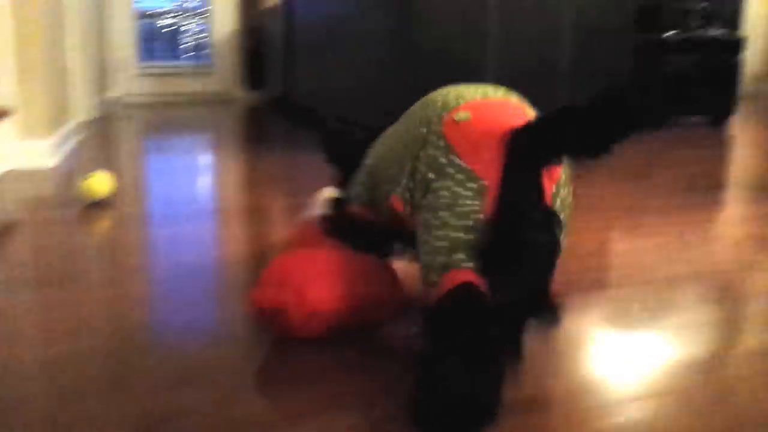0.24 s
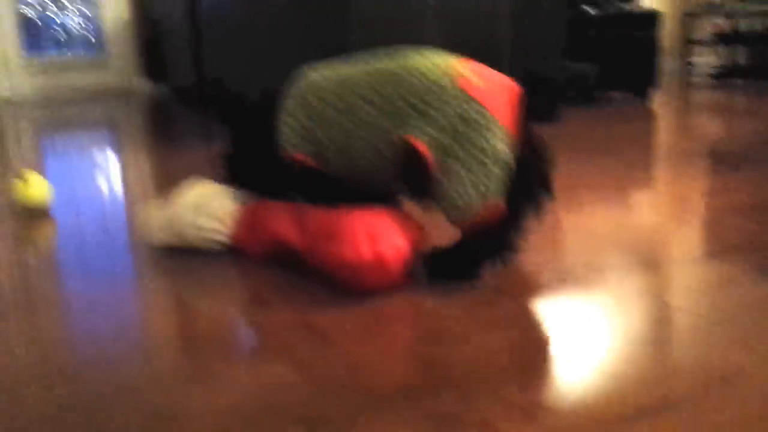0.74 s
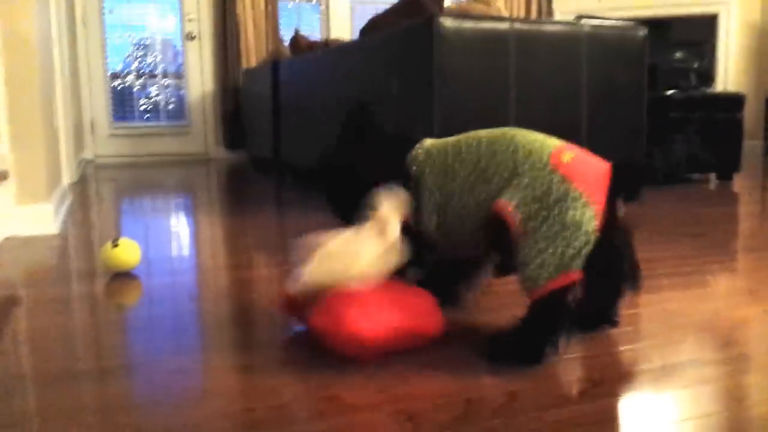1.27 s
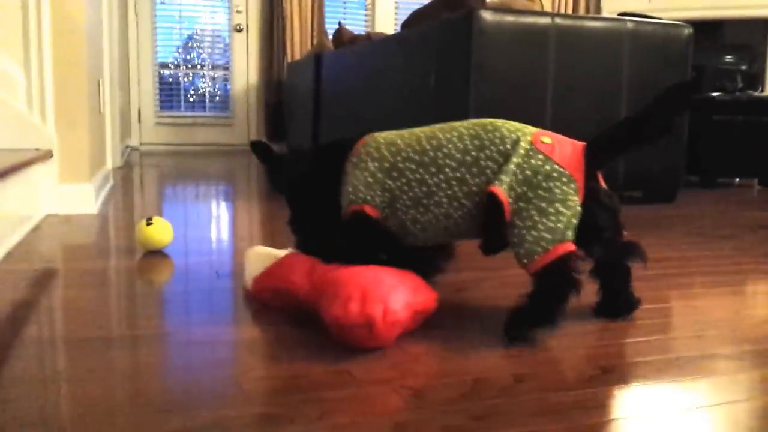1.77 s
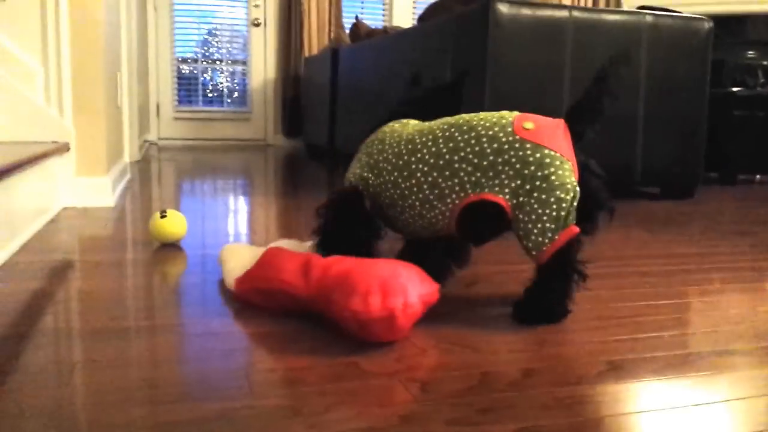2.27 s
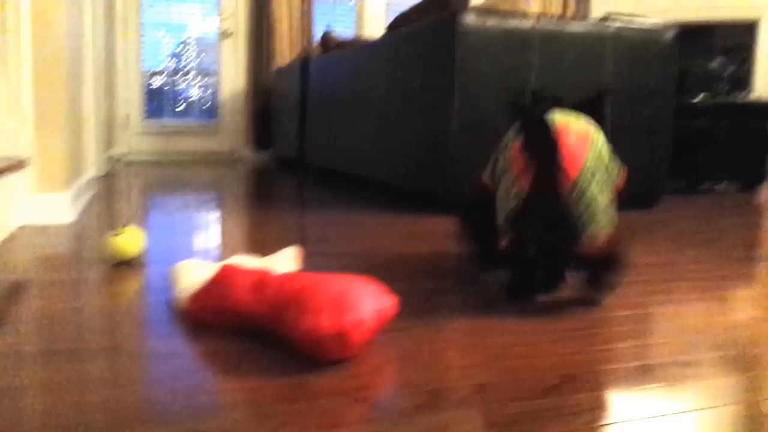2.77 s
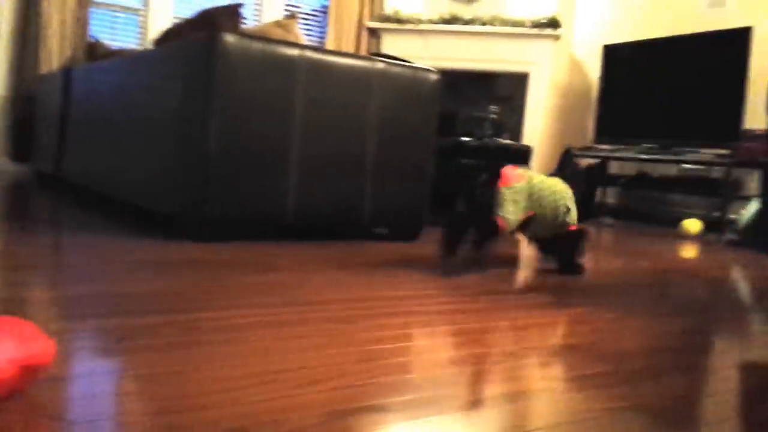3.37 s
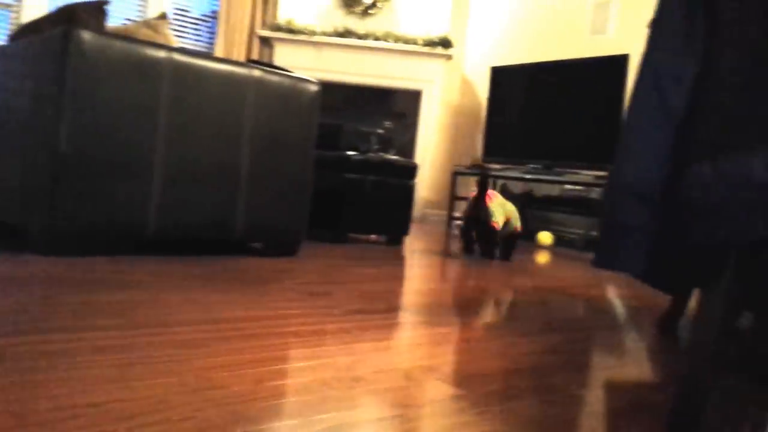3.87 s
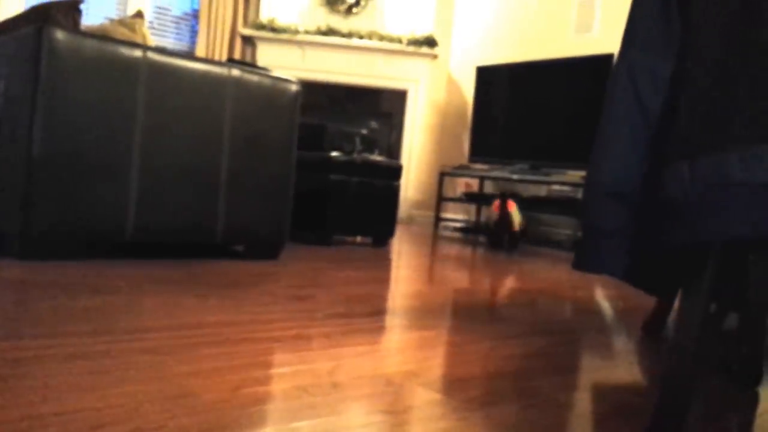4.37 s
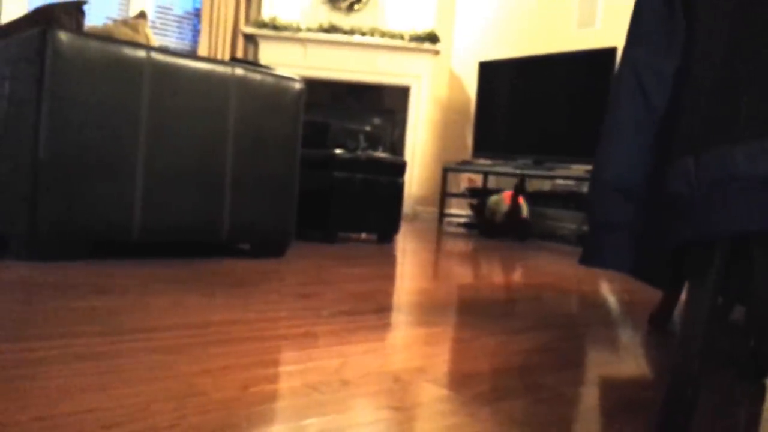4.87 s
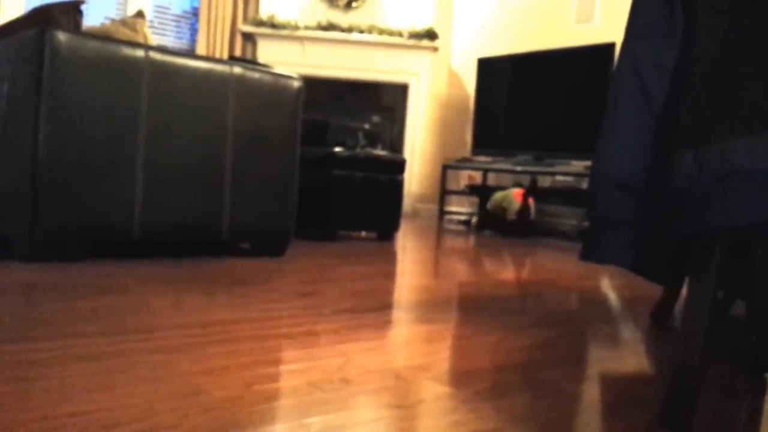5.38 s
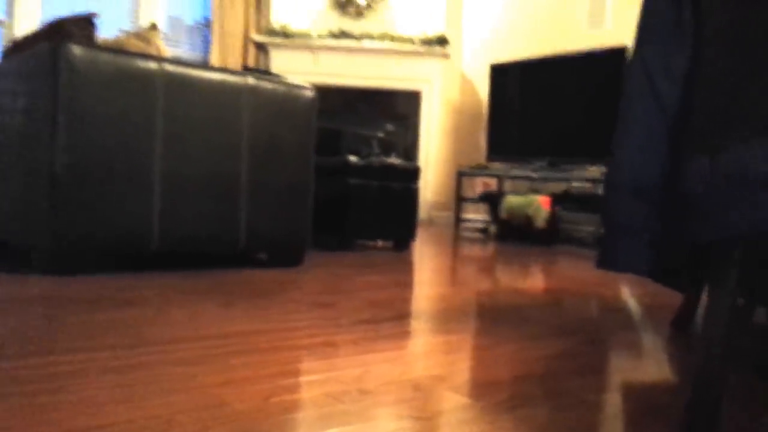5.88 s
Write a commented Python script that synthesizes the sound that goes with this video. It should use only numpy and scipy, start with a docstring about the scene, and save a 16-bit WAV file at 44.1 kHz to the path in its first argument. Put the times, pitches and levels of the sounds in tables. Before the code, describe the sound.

In a reverberant living room with a hardwood floor, a small dog is right beside a handheld camera. From 0 s its claws scratch finely, with soft paw thuds and brief scuffs; sharp loud clicks snap at about 0.3-0.4 s, with a dry tap at the left. It quietens to light scrapes and a soft toy thump near 1.2 s. At 1.4 s a tennis ball lands with a hollow knock and bounces faster and softer until about 2.4 s, amid isolated claw ticks. From 2.45 to 3.1 s claws scrabble hard and bright, with very sharp clicks around 2.7 and 2.95 s. The dog then runs off, 3.2-4.6 s, in pattering thuds, woody clacks and scrapes, increasingly distant and echoing. A scuff comes near 4.8 s, a clearer click at 5.1 s, then sparse faint scratches to 6.1 s. Low handling rumble, airy hiss and a faint appliance hum lie beneath.

```python
"""Claws of a small dog click and scrape on a hardwood floor as it scrabbles for grip and runs to the far wall:
slip-modulated noise, coloured by tips and board, wetter with distance. Paws and a plush toy thud, and a tennis
ball bounces to rest: decaying floor modes plus a noise slap. Planks clack as damped sines; short scuffs are
resonant noise, some along with claw strikes; one dry tap sounds at the left microphone. Beneath:
filtered-noise room air and handling rumble of a handheld camera, and an appliance's sine hum."""
import sys
import numpy as np
from scipy import signal
from scipy.fft import rfft, irfft, next_fast_len
from scipy.io import wavfile
from scipy.ndimage import uniform_filter1d, minimum_filter1d, map_coordinates

SR = 44100
rng = np.random.default_rng(int(sys.argv[2]) if len(sys.argv) > 2 else 0)


def file_out(sig):
    """Save sig as 16-bit WAV at sys.argv[1]."""
    # one column per channel
    cols = np.atleast_2d(sig).T
    # limit, then scale
    lim = np.clip(cols, -1, 1)
    pcm = np.round(lim * 32767).astype(np.int16)
    wavfile.write(sys.argv[1], SR, pcm)


N = 270068

# dog to microphones: t/s, distance/m
DISTANCE = [(0, 0.28), (1.9, 1.07), (2.7, 1.29), (3.2, 1.7), (4, 2.12), (6.1, 1.52)]
# scratching effort of the paws: t/s, level/dB
SCRATCH = [(0, -42), (.35, -46), (.7, -65.5), (.89, -43.5), (1.12, -71), (1.42, -49), (2.48, -52.5),
           (2.58, -33), (2.68, -38.5), (2.89, -31), (3.17, -38.5), (3.88, -37.5), (4.02, -46), (4.78, -43),
           (4.97, -51), (5.7, -60), (6.12, -56)]
# colour of claw on board: f/Hz, gain/dB
CLAW_COLOUR = [(100, -21.5), (300, -14), (900, -15.5), (1700, -9), (3400, -7), (4800, -5), (5600, 0.5),
               (6200, 4), (7000, -1.5), (8000, -5.5), (10000, -12), (12600, -20), (14400, -27.5),
               (15200, -57)]


def amp(db):
    """Amplitude factor of a level in dB."""
    return 10 ** (np.asarray(db) / 20)


def unit(x):
    """x scaled to rms 1."""
    return x / np.sqrt(np.mean(x ** 2) + 1e-20)


def along(points, hz):
    """(f/Hz, value) points interpolated on a log frequency axis."""
    f, v = np.transpose(points)
    return np.interp(np.log(hz + 1), np.log(f), v)


def curves(rows):
    """One value per sample for each column after the time."""
    s, *cols = np.transpose(rows)
    return [np.interp(np.arange(N) / SR, s, c) for c in cols]


def coloured(x, gain_db):
    """x through the causal minimum-phase filter of gain gain_db(hz), by cepstral folding."""
    n = x.shape[-1]
    m = 2 * next_fast_len(n // 2 + 2048)
    gain = amp(gain_db(np.fft.rfftfreq(m, 1 / SR)))
    cepstrum = irfft(np.log(np.maximum(gain, 1e-6)), m)
    cepstrum[1:m // 2] *= 2
    cepstrum[m // 2 + 1:] = 0
    return irfft(rfft(x, m) * np.exp(rfft(cepstrum)), m)[..., :n]


def pair(size, alike):
    """White noise at two microphones; alike is the shared fraction of power."""
    share = np.clip(alike, 0, 1)
    common = np.sqrt(share) * rng.standard_normal(size)
    return common + np.sqrt(1 - share) * rng.standard_normal((2, size))


def add(track, s, sound):
    """Mix a sound in at time s."""
    part = track[:, max(round(s * SR), 0):][:, :sound.shape[-1]]
    part += sound[..., :part.shape[1]]


def resonance_db(hz, centre_hz, q):
    """Gain of one broad resonance."""
    return -10 * np.log10(1 + q ** 2 * ((hz + 1) / centre_hz - centre_hz / (hz + 1)) ** 2)


def ripple(hz, spacing_hz):
    """Random spectral peaks and dips, new at every call."""
    place = hz / max(spacing_hz, 50)
    return map_coordinates(rng.standard_normal(int(place[-1]) + 4), [place])


def flutter(size, per_s):
    """Smooth random curve with per_s knots a second."""
    place = np.arange(size) * per_s / SR
    return map_coordinates(rng.standard_normal(int(place[-1]) + 4), [place])


def board_share(hz, edge_hz=4700):
    """1 where the boards ring, 0 in the treble where the claw tips do."""
    return 1 / (1 + (hz / edge_hz) ** 10)


def room(x, build_s=0.0044, early=0.48, early_life_s=0.0063):
    """Room response: strong first reflections, then a noise tail that decays band by band."""
    # f/Hz, t60/s
    reverb_t60 = [(150, 0.066), (1000, 0.89), (3500, 0.7), (6500, 0.58), (10000, 0.46), (15000, 0.21)]
    hz, t, z = signal.stft(rng.standard_normal((2, SR * 2 // 3)), SR, nperseg=256)
    decay = amp(-60 * t / along(reverb_t60, hz)[:, None])
    tail = signal.istft(z * decay, SR, nperseg=256)[1]
    t = np.arange(tail.shape[1]) / SR
    tail = tail * (1 - np.exp(-t / build_s)) * (1 + early * np.exp(-t / early_life_s))
    return signal.fftconvolve(x, tail / np.linalg.norm(tail[0]), axes=1)


def background(air_db=-58, hum_hz=119):
    """Filtered-noise room air and handling rumble; an appliance's sine hum, louder toward the far wall."""
    # f/Hz, gain/dB
    air_colour = [(59, -33), (100, -14), (129, -12), (169, -20), (297, -3.5), (502, -12), (607, -16),
                  (962, -15.5), (2750, -8), (3180, -13.5), (6090, -3.5), (13000, -26), (15000, -65)]
    handling_colour = [(20, -9), (33, -9), (45, 1), (65, 3), (150, 1), (220, 0.5), (380, -6), (600, -5.5),
                       (900, -11.5), (1600, -18), (4000, -61)]
    # camera handling and trembling boards: t/s, level/dB
    rumble_level = [(0, -47), (.27, -48.5), (.5, -61.5), (1.1, -63), (1.5, -48.5), (2.3, -50), (2.6, -46.5),
                    (3.4, -47.5), (3.7, -49), (4.5, -49), (6.12, -54.5)]
    # t/s, level/dB
    hum_level = [(0, -70), (2.5, -56.5), (4.5, -55), (6.12, -57)]
    air = amp(air_db) * unit(coloured(pair(N, alike=0.13), lambda hz: along(air_colour, hz)))
    shaking = unit(coloured(pair(N, alike=0.87), lambda hz: along(handling_colour, hz)))
    rumble = amp(curves(rumble_level)[0]) * shaking
    tone = np.sqrt(2) * np.sin(2 * np.pi * hum_hz * np.arange(N) / SR)
    return air + rumble + amp(curves(hum_level)[0]) * tone


def scuffle(board_db=-6, grains_per_s=160, grain_db=2.0):
    """Fine scratching noise; the harder it is, the more the tips outweigh the board."""
    easy_db, board_loss_db_per_db = -44, 0.15
    tip_db, = curves(SCRATCH)
    level_db = tip_db + board_db - board_loss_db_per_db * (tip_db - easy_db)
    grit = amp(grain_db * flutter(N, grains_per_s)) * pair(N, alike=0.035)
    tips = unit(coloured(grit, lambda hz: along(CLAW_COLOUR, hz) - 30 * board_share(hz)))
    # [::-1] swaps the channels
    board = unit(coloured(grit[::-1], lambda hz: along(CLAW_COLOUR, hz) - 30 * (1 - board_share(hz))))
    return amp(tip_db) * tips + amp(level_db) * board


def ring(modes, t, attack_s, damping, detune=0.0402):
    """Floor modes, struck at new strengths and pitches on every spot; rms 1 over the first 50 ms."""
    wave = np.zeros(len(t))
    for hz, db, t60 in modes:
        level_db = db + rng.normal(0, 2.9) - 60 * damping * t / t60
        wave += amp(level_db) * np.sin(2 * np.pi * (hz * rng.normal(1, detune) * t + rng.random()))
    wave = wave * (1 - np.exp(-t / attack_s))
    return wave / np.sqrt(np.mean(wave[:SR // 20] ** 2))


def thuds(rows, slap_t60_s, slap_q, damping, room_db):
    """Soft blows on the floor: slap of one board, hollow knock, then the slower boom of the whole span."""
    # floorboard modes: f/Hz, level/dB, t60/s at damping 1
    boom_modes = [(76, -6.5, 0.17), (87.2, -1.5, 0.19), (106.1, -9.5, 0.34)]
    knock_modes = [(133.8, -3.5, 0.51), (166, -0.5, 0.32), (196.4, 3, 0.28), (235.7, -0.5, 0.3),
                   (281.4, -4.5, 0.2), (349.5, -11, 0.15)]
    out, t = np.zeros((2, N)), np.arange(SR // 3) / SR
    for s, boom_db, knock_db, slap_db, slap_hz in rows:
        slap = unit(coloured(pair(len(t), alike=0.88), lambda hz: (
            2 * resonance_db(hz, slap_hz, slap_q) - 20 * (1 - board_share(hz, 2900)))))
        slap = slap * amp(slap_db + 7.5 - 60 * t / slap_t60_s)
        knock = amp(knock_db) * ring(knock_modes, t, 0.00047, damping) + slap
        add(out, s, knock + amp(boom_db) * ring(boom_modes, t, 0.019, damping))
        add(out, s, amp(room_db) * room(knock))
    return out


def paws(count=20, patter_hardness_db=-1):
    """Landings of paws and toy, and the run's lighter patter: a hard one slaps, a soft one booms."""
    # t/s, knock level/dB, hardness/dB, slap f/Hz
    landings = [(.002, -50, 12.5, 380), (.011, -55, 9.5, 620), (.316, -51.5, 8.5, 695),
                (0.545, -56, -6, 397), (.655, -59, 8, 350), (0.937, -64, -28.5, 398),
                (1.182, -41, -18.5, 446), (1.489, -40.5, -1, 700), (2.493, -45.5, 7.5, 750),
                (2.535, -37, -10, 680), (3.018, -44.5, 7.5, 940), (3.164, -38.5, -4, 400),
                (3.234, -54, 15.5, 596), (3.261, -37.5, -4, 590), (3.321, -45.5, 3, 594),
                (3.352, -42.5, -3.5, 604), (3.43, -41.5, -1, 660), (3.471, -39, 1.5, 565),
                (3.568, -43, 1, 605), (3.872, -43.5, 2.5, 670), (4.03, -50.5, 8.5, 730),
                (4.391, -44, -7, 597)]
    # boom and slap relative to the knock at hardness 0
    boom_db, slap_db = -11, -4
    run_start_s, run_end_s = 3.17, 4.6
    patter_db, fade_db_per_s, patter_slap_hz = -48, 1, 585
    since = (run_end_s - run_start_s) * (np.arange(count) + rng.random(count)) / count
    patter = [(run_start_s + t, patter_db - fade_db_per_s * t, patter_hardness_db, patter_slap_hz)
              for t in since]
    rows = [(s, db + boom_db - hard, db, db + slap_db + hard, hz) for s, db, hard, hz in landings + patter]
    return thuds(rows, slap_t60_s=0.08, slap_q=3.7, damping=0.95, room_db=-11.0)


def scuffs(room_db=-14, catches_per_s=350, catch_db=3):
    """Short scuffs of resonant noise, some along with claw strikes: a catching swell, wetter from farther."""
    # t/s, length/s, f/Hz, Q, level/dB
    swells = [(0.203, .04, 3070, 1.1, -40), (0.313, 0.025, 3400, 2.1, -27),
              (0.592, 0.017, 2960, 1.8, -35.5), (0.83, 0.095, 2650, 6.2, -52.5),
              (1.218, 0.1, 1860, 2.7, -57), (2.438, 0.04, 4260, 2.7, -35.5), (4.766, 0.13, 1030, 0.97, -44)]
    out = np.zeros((2, N))
    for s, length, pitch_hz, q, db in swells:
        phase = np.linspace(0, 1, int(length * SR))
        friction = amp(catch_db * flutter(len(phase), catches_per_s)) * pair(len(phase), alike=0.36)
        scuff = unit(coloured(friction, lambda hz: 2 * resonance_db(hz, pitch_hz, q)))
        add(out, s, amp(db) * scuff * np.sin(np.pi * np.sqrt(phase)))
    return out + amp(room_db) * room(out * curves(DISTANCE)[0])[:, :N]


def slips(t, drag_s, slips_per_s=800, slip_life_s=0.0007, scatter_db=3.5, scrape=0.57, loading=0.08):
    """Power over time of one strike: a tick, then tiny slips for as long as the claws drag."""
    count = 1 + int(drag_s * slips_per_s)
    jitter = rng.random(count) * (np.arange(count) > 0)
    age = t - (drag_s * (np.arange(count) + jitter) / count)[:, None]
    decays = (age >= 0) * np.exp(-2 * np.abs(age) / slip_life_s)
    ticks = amp(scatter_db * rng.standard_normal(count)) ** 2 @ decays
    power = ticks / ticks.sum() + scrape * np.exp(-t / drag_s) / (drag_s * SR)
    # weight comes onto the paw over the first part of the drag
    return power * (1 - np.exp(-t / (loading * drag_s)))


def light_ticks(count=34, crowding=0.6, colour_db=3):
    """Random small claw contacts, denser and stronger with harder scratching, as strike rows."""
    from_s, over_scratch_db, drag_s = 2.5, 11, 0.0025
    when, size = rng.random((count, 2)).T
    board_db, bright_db = colour_db * rng.standard_normal((count, 2)).T
    effort_db, = curves(SCRATCH)
    due = np.cumsum(amp(crowding * effort_db) * (np.arange(N) / SR > from_s))
    at = np.searchsorted(due, due[-1] * (np.arange(count) + when) / count)
    level_db = effort_db[at] + over_scratch_db - 6 * size
    return list(zip(at / SR, level_db, np.full(count, drag_s), board_db, bright_db))


def claws(even_m=1.58, ripple_db=2.5, shared_ripple_db=1.3, ripple_hz=210, snap_hz=7900, snap_db=8,
          snap_life_s=0.0043, build_s_per_m=0.00082, diffuse_colour=0.74):
    """Every strike rings claw tips and board, heard directly and by way of the room."""
    # single strikes that stand out: t/s, level/dB, drag/s, board ring/dB, tip brightness/dB
    strikes = [(0.221, -32.5, 0.014, 9.5, -25), (0.316, -18.5, .004, -3, 1), (0.3216, -15, 0.0022, -3, 4),
               (0.3628, -2.5, 0.00062, -17.5, -4.5), (0.3661, -4, 0.00077, -14.5, 3),
               (0.402, -23, 0.0013, -10, -1), (0.4135, -21, 0.00094, 0, 4), (0.568, -43, 0.006, 5, -2),
               (0.589, -35.5, 0.0062, 16, -8), (0.757, -35.5, 0.0048, 4.5, 4),
               (0.803, -41.5, 0.0061, -10, 1), (0.868, -36, 0.012, -5.5, -1), (1.079, -45, 0.0073, 9, 9),
               (1.325, -38, 0.0038, 1, -8), (1.334, -34, 0.013, -0.5, -1), (1.754, -27, 0.0087, 1.5, 3),
               (1.791, -34, 0.015, -6, -7), (1.937, -19, .011, -1.5, 2.5), (2.33, -26.5, 0.012, -0.5, 1.5),
               (2.453, -20.5, 0.0048, -3, 10.5), (2.4912, -17.5, 0.0058, 1.5, 6),
               (2.4985, -17, 0.0018, 2.5, -5), (2.534, -11.5, 0.004, 1.5, 10), (2.54, -19, 0.012, 0.5, 10),
               (2.569, -23.5, 0.029, 0.5, 10), (2.687, -22, 0.0065, 7, 4), (2.7245, -7, 0.0018, 2, 16),
               (2.747, -25, 0.01, 4.5, 8), (2.775, -14, .004, 5, 4), (2.802, -20.5, 0.017, -1.5, 6),
               (2.8537, -14.5, .005, 1.5, 6), (2.873, -16.5, 0.019, -2, -1), (2.919, -19, .014, -15, -3),
               (2.9537, 0, 0.00033, -15, 13.5), (3.014, -24, 0.015, 7.5, 7), (3.092, -18.5, 0.0062, 3, 9.5),
               (3.269, -30.5, .012, 4, 4), (3.31, -28.5, 0.036, 2.5, 8), (3.433, -31, 0.0071, 1, 3),
               (3.474, -26.5, 0.011, -7, 2), (3.499, -24, 0.012, -12, 4), (3.582, -31, 0.0073, -3, -3),
               (3.658, -27.5, 0.024, -7, 8.5), (3.789, -30.5, .025, 5, 8), (3.811, -26.5, 0.03, -1.5, 6),
               (4.027, -27, 0.01, 7.5, 6), (4.042, -23, 0.0082, -2, -1), (4.111, -27.5, 0.025, 4, 1.5),
               (4.279, -24.5, .022, 0.5, 3.5), (4.392, -25, 0.02, 0, 5), (4.542, -36.5, 0.033, 2.5, -6),
               (4.592, -35, 0.034, 1, -1), (4.678, -33, 0.024, 0, 0), (4.99, -39, 0.023, -1, -6),
               (5.097, -28, .006, 4, 10), (5.102, -18, 0.009, -6, -5), (5.327, -35.5, 0.023, 0.5, -0.5),
               (5.575, -31, 0.0061, 0.5, -2), (5.993, -32, 0.012, -5.5, -10)]
    bright_from_hz, bright_full_hz = 6300, 11500
    out, t = np.zeros((2, N)), np.arange(SR // 12) / SR
    for s, db, drag_s, board_db, bright_db in strikes + light_ticks():
        metres = np.interp(s, *np.transpose(DISTANCE))
        force = np.sqrt(slips(t, drag_s)) * pair(len(t), alike=0.17)

        def own_db(hz):
            """This strike's board, treble and tip ring; the tip rings most on short drags."""
            bright = along([(bright_from_hz, 0), (bright_full_hz, bright_db)], hz)
            snap = snap_db * np.exp(-drag_s / snap_life_s) * amp(resonance_db(hz, snap_hz, q=6.7))
            return board_db * board_share(hz) + bright + snap

        force = coloured(force, lambda hz: shared_ripple_db * ripple(hz, ripple_hz))
        direct = coloured(force, lambda hz: (
            along(CLAW_COLOUR, hz) + own_db(hz) + ripple_db * ripple(hz, ripple_hz)))
        # the room gathers all directions, which evens out a strike's own colour
        spread = coloured(force, lambda hz: along(CLAW_COLOUR, hz) + diffuse_colour * own_db(hz))
        # room gain equals direct gain at even_m
        wet = metres / even_m
        gain = amp(db) * np.sqrt(2 * drag_s * SR / (1 + 0.42 * wet ** 2)) / np.linalg.norm(direct)
        add(out, s, gain * direct)
        add(out, s, gain * wet * room(spread, build_s=build_s_per_m * metres))
    return out


def tap(at_s=0.407, level_db=-16, t60_s=0.0064, right_db=-16):
    """Hard tap beside the left microphone: one dry decaying noise tick, right_db weaker at the right."""
    # f/Hz, gain/dB
    tap_colour = [(100, -10), (600, -7.5), (1500, -2.5), (2600, -7), (6000, -10), (14000, -20.5)]
    out, t = np.zeros((2, N)), np.arange(SR // 20) / SR
    tick = coloured(amp(-60 * t / t60_s) * rng.standard_normal(len(t)), lambda hz: along(tap_colour, hz))
    tick = tick / np.sqrt(np.mean(tick[:SR // 1000] ** 2))
    add(out, at_s, amp(level_db) * tick * amp([[0], [right_db]]))
    return out


def ball(count=11):
    """Tennis ball: flights shrink geometrically; boom, knock and slap fade at their own rates."""
    # first bounces, each on its own spot of floor: boom/dB, knock/dB, slap/dB offsets
    spots = [(-7.5, -8, 1.5), (-2.5, 0.5, -4), (-1, -5.5, 9.5), (1, 1.5, 5), (0.5, 3, 4.5)]
    first_s, flight_s, rebound, slap_hz = 1.430, .211, .808, 930
    # boom, knock, slap: base level, loss per bounce
    base_db, loss_db = (-30.5, -30.5, -44), (1.6, 3.5, 3)
    k = np.arange(count)
    times = first_s + flight_s * (np.cumsum(rebound ** k) - rebound ** k)
    levels_db = np.array(base_db) - np.outer(k, loss_db)
    levels_db[:len(spots)] += spots
    rows = np.column_stack([times, levels_db, np.full(count, slap_hz)])
    return thuds(rows, slap_t60_s=0.066, slap_q=0.75, damping=0.63, room_db=-5)


def clacks(q=3, t60_s=0.051, rattle=0.2, room_db=-7):
    """Woody clacks: damped plank modes, strongest near the pitch the contact favours, plus a little rattle."""
    # t/s, favoured f/Hz, level/dB
    contacts = [(1.502, 1840, -43), (2.776, 1280, -33), (3.02, 1170, -34.5), (3.268, 600, -28.5),
                (3.322, 1650, -35.5), (3.348, 2000, -31.5), (3.655, 1230, -35.5), (3.791, 1220, -33.5),
                (4.403, 2880, -32)]
    # higher modes of a single plank: f/Hz
    plank_hz = [588, 1245, 1641, 1970, 2770]
    out, t = np.zeros((2, N)), np.arange(SR // 8) / SR
    for s, pitch_hz, db in contacts:
        modes = np.zeros((2, len(t)))
        for hz in plank_hz:
            # phase differs between the microphones
            cycles = hz * t + rng.random() + rng.random((2, 1)) / np.pi
            modes += amp(resonance_db(hz, pitch_hz, q)) * np.sin(2 * np.pi * cycles)
        buzz = unit(coloured(pair(len(t), alike=0.5), lambda hz: 2 * resonance_db(hz, pitch_hz, q)))
        add(out, s, amp(db - 60 * t / t60_s) * (unit(modes) + rattle * buzz))
    return out + amp(room_db) * room(out)[:, :N]


def scene():
    """The dog, its toy and the ball in the living room."""
    return background() + scuffle() + paws() + scuffs() + claws() + tap() + ball() + clacks()


def limited(x, top=0.93, ahead_s=0.0048, hold_s=0.013):
    """Look-ahead limiter: both channels duck briefly around a peak above top."""
    ahead, hold = int(ahead_s * SR), int(hold_s * SR)
    need = top / np.maximum(np.abs(x).max(axis=0), top)
    held = minimum_filter1d(need, ahead + hold, origin=(hold - ahead) // 2)
    return x * uniform_filter1d(held, ahead)


def record(dry):
    """Each port's resonance colours its channel; the camera limits peaks and cuts all above its band."""
    # two ports of different pitch: f/Hz, left minus right/dB
    port_balance = [(100, 0.5), (800, 1), (2200, 5), (3200, 3.5), (4700, 4), (5900, 14), (6600, 12.5),
                    (7400, 1), (8500, -4), (11000, -6), (13000, -16.5), (15000, -13)]
    top_hz = 15500
    m = next_fast_len(N + SR // 4)
    hz = np.fft.rfftfreq(m, 1 / SR)
    ratio = amp(along(port_balance, hz))
    # the pair keeps its summed power gain at every frequency
    ports = np.array([ratio, np.ones_like(hz)]) * np.sqrt(2 / (1 + ratio ** 2))
    heard = limited(irfft(rfft(dry, m) * ports, m))
    return irfft(rfft(heard) * (hz < top_hz), m)[:, :N]


dry = scene()
out = record(dry)
file_out(out)
```